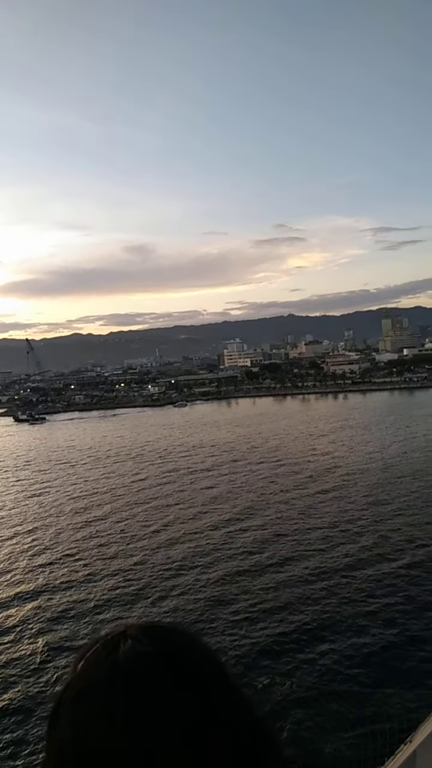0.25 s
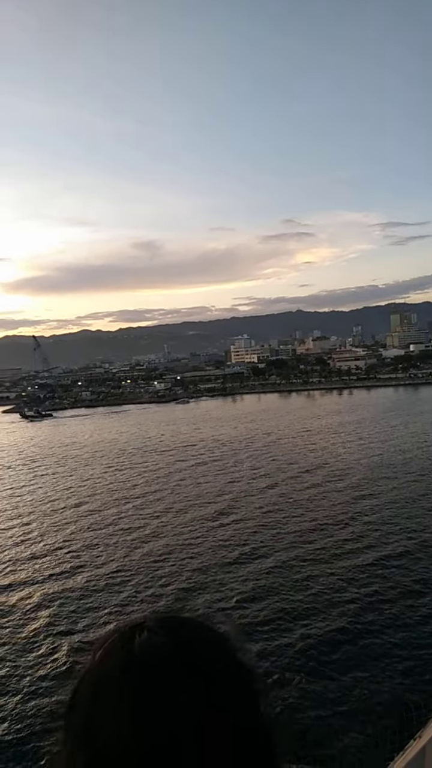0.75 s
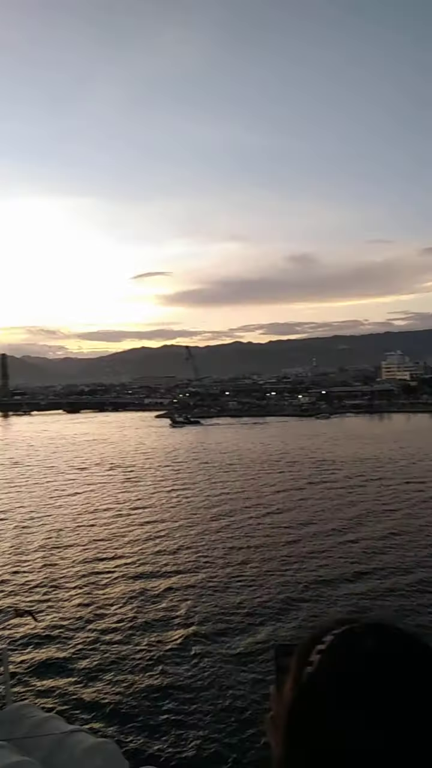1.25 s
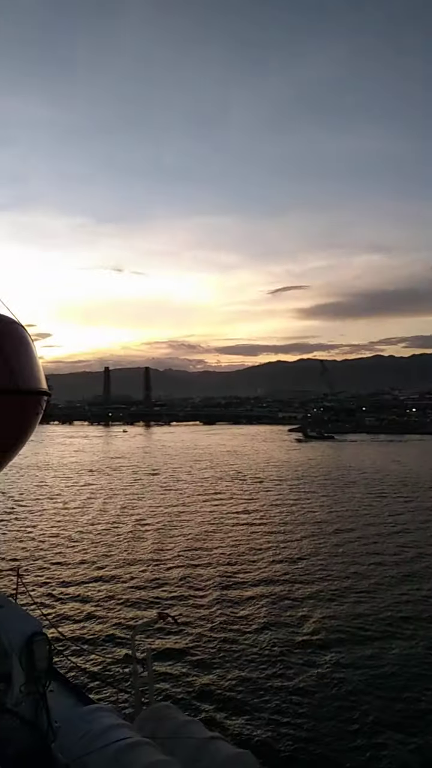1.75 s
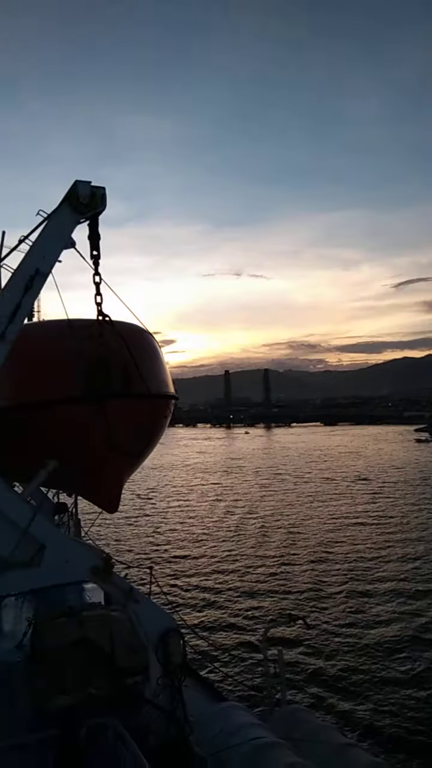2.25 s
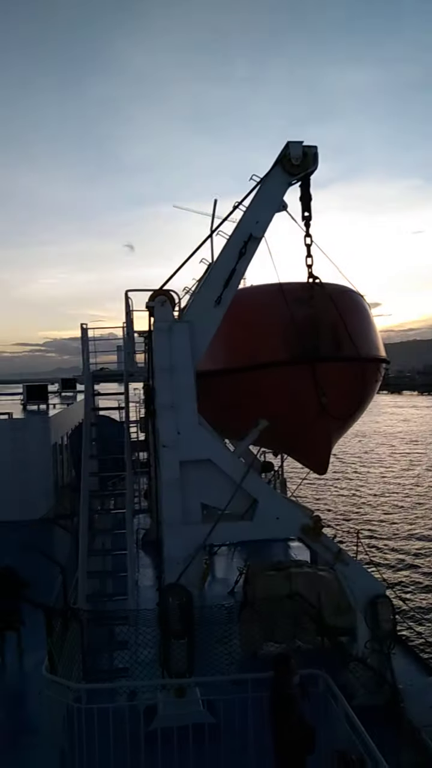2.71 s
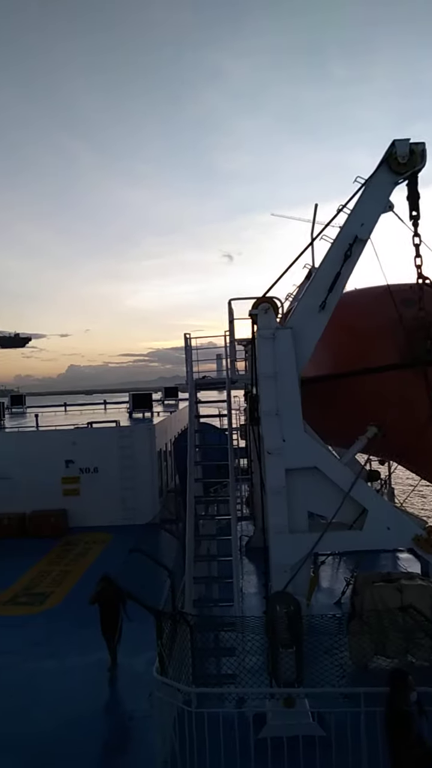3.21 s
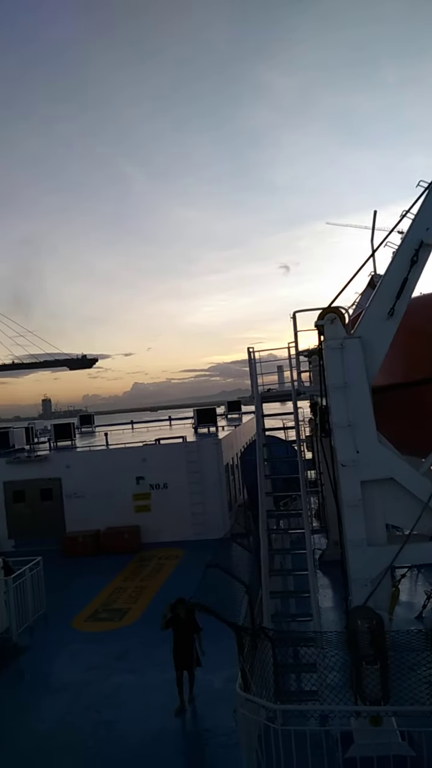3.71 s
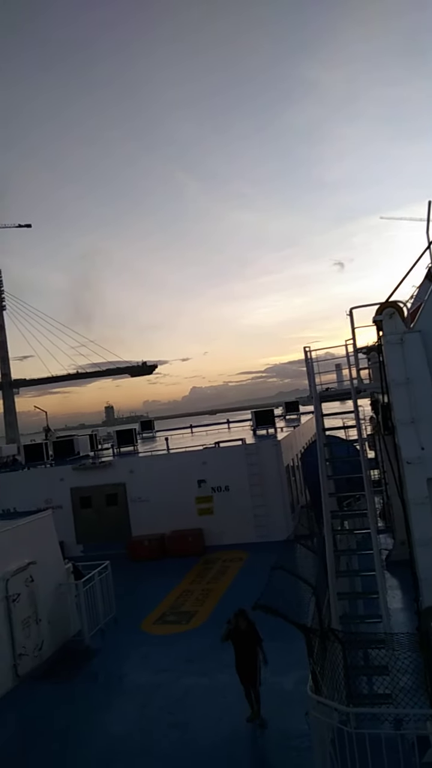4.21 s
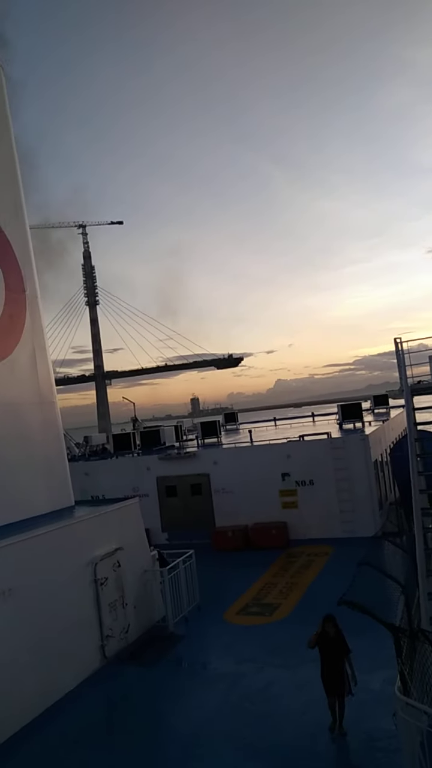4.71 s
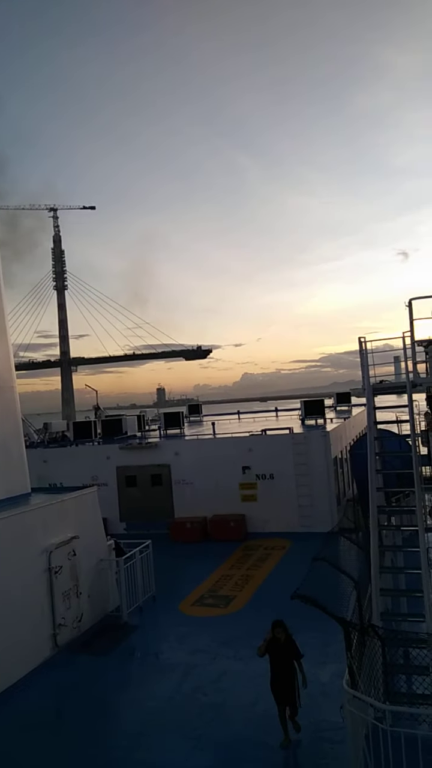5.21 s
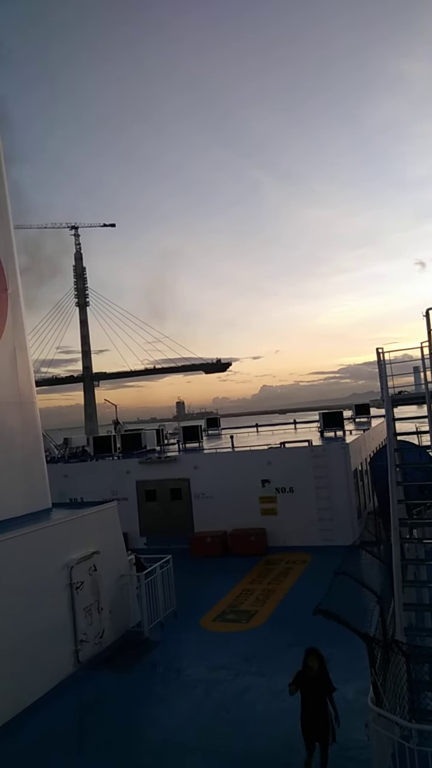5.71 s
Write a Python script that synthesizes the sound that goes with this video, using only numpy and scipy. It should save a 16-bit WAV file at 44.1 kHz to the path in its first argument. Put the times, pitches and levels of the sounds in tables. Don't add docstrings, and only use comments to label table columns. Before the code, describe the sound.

Low diesel hum and gulping, whistling air vents on an open ship deck; spray hisses by, then airy puffs and faint metallic knocks.

```python
import sys
import numpy as np
from scipy import signal
from scipy.fft import rfft, irfft, next_fast_len
from scipy.io import wavfile
from scipy.ndimage import uniform_filter1d

SR = 44100
rng = np.random.default_rng(int(sys.argv[2]) if len(sys.argv) > 2 else 0)


def volts(x):
    e = np.asarray(x, float) / 20
    return 10 ** e


def put_to_file(sound):
    columns = np.atleast_2d(sound).T
    safe = np.clip(columns, -1, 1)
    whole_steps = np.round(safe * 32767)
    wavfile.write(sys.argv[1], SR, whole_steps.astype(np.int16))


N = 262386
T = np.arange(N) / SR
LONG = next_fast_len(N)
HZ = np.arange(LONG // 2 + 1) * SR / LONG


def level(x, db):
    return x * volts(db) / np.sqrt(np.mean(x ** 2))


def across(table, hz):
    f, db = np.transpose(table)
    return np.interp(np.log(hz + 1), np.log(f), db)


def closed(table):
    ends = np.log([table[0][0], table[-1][0]])

    def colour(hz):
        outside = np.abs(np.log(hz + 1) - np.clip(np.log(hz + 1), *ends))
        return across(table, hz) - 300 * outside
    return colour


def noise(db_of_hz):
    white = rfft(rng.standard_normal(LONG))
    return level(irfft(white * volts(db_of_hz(HZ)), LONG)[:N], 0)


def curves(table):
    s, *columns = np.transpose(table)
    return [np.interp(T, s, c) for c in columns]


def walk(rate):
    k = int(SR / rate)
    held = np.repeat(rng.standard_normal(N // k + 1), k)
    return 0.64 * uniform_filter1d(uniform_filter1d(held, k), k)[:N]


def burst(s, length, edge_s=0.028):
    return np.interp(T, [s - edge_s / 2, s + edge_s / 2, s + length, s + length + 2 * edge_s], [0, 1, 1, 0])


# (t/s, share 0-1)
TURN = [
    (0, 0.17),
    (1.3, 0.02),
    (2.2, 0.83),
    (2.95, 0.4),
    (3.06, 0.81),
    (4.1, 0.95),
    (5.95, 0.82),
]


def turned(rail_db, funnel_db):
    waking = np.clip(1 - T / 0.39, 0, 1)
    return rail_db + (funnel_db - rail_db) * curves(TURN)[0] - 9.5 * waking


def resonant(bands, flutter_db, lift_db=0):
    out = 0
    for centre, width, rail_db, funnel_db in bands:
        band = noise(lambda hz: -30 * np.log10(1 + ((hz - centre) / (width / 2)) ** 2))
        out = out + volts(turned(rail_db, funnel_db) + lift_db + flutter_db * walk(15)) * band
    return out


def wavering_tones(table, steady=1.15):
    out = np.zeros(N)
    waver = uniform_filter1d(rng.standard_normal((2, N)), int(0.009 * SR), axis=1)
    waver = steady + (waver[0] + 1j * waver[1]) / waver.std()
    for s, length, hz, db in table:
        span = slice(int(s * SR), min(int((s + length) * SR), N))
        own_waver = waver[int(7 * hz):][:len(T[span])]
        tone = (own_waver * np.exp(2j * np.pi * hz * T[span])).real
        out[span] += level(tone * signal.windows.tukey(len(tone), .5), db + 0.5)
    return out


def short_rings(table):
    out, t = np.zeros(N + SR), T[:SR // 5]
    attack_s, t60_s = 0.0012, 0.085
    shape = np.clip(t / attack_s, 0, 1) * volts(-60 * t / t60_s)
    for s, db, hz in table:
        neighbour_hz = hz + 70 * rng.standard_normal()
        beat = np.sin(2 * np.pi * hz * t) + 0.24 * np.sin(2 * np.pi * neighbour_hz * t)
        out[int(s * SR):][:len(t)] += volts(db + 1) / 3.24 * shape * beat
    return out[:N]


# (f/Hz, level/dB per Hz)
RUMBLE = [(15, -32), (25, -13), (54, -3), (81, -4), (130, -8), (240, -14), (301, -13), (525, -17),
          (600, -71), (780, -73), (1320, -120)]
# (f/Hz, level/dB per Hz)
ROAR = [(300, 1.5), (400, 6), (530, -0.5), (900, -2.5), (1100, -11), (1520, -10.5), (1750, -13.5),
        (2120, -10.5), (2480, -21), (2800, -28.5), (3600, -56)]
# (f/Hz, level/dB per Hz)
HISS = [(1650, -79), (2800, 2), (3390, 0), (3850, 5), (4380, -3), (4730, -1.5), (5530, -4), (8000, -3.5),
        (10500, -18.5), (10800, -16.5), (12800, -3), (15200, -16.5)]
# (f/Hz, depth/dB)
DEPTH = [(300, -0.5), (450, 10), (2500, 20.5), (5000, 17.5), (8500, 18), (10800, 16.5), (12500, 2.5),
         (15500, 10)]


def roar():
    out = volts(-47.5 + 0.54 * walk(3.6)) * noise(closed(RUMBLE))
    for colour, left_db in ((ROAR, -58), (HISS, -72.5)):
        left = closed(colour)(HZ)
        whole = left + across(DEPTH, HZ)
        lift = np.sqrt(np.sum(volts(2 * whole)) / np.sum(volts(2 * left)))
        out += volts(left_db) * lift * noise(lambda hz: whole)
    return out


# (f/Hz, width/Hz, level/dB at the rail, level/dB at the funnel)
DUCTS = [(903, 230, -54, -63), (1374, 205, -63.5, -62), (1538, 238, -52, -60), (2125, 178, -58.5, -57.5),
         (2120, 654, -85, -48.5), (3220, 1380, -56.5, -76.5)]
# (t/s, length/s, lift/dB)
LOW_GULPS = [
    (0.574, 0.072, -2),
    (0.8, 0.12, 5),
    (1.147, 0.24, 3),
    (1.74, 0.15, 9.5),
    (2.044, 0.39, 8),
    (3.625, 0.39, 12),
    (4.32, 0.37, 6),
    (3.06, 0.07, 10),
]
# (t/s, length/s, lift/dB)
SECOND_GULPS = [
    (2.278, 0.62, 9.5),
    (3.052, 0.21, 4),
    (3.616, 0.39, 7),
    (5.27, 0.18, 5.5),
    (5.813, 0.069, 6.5),
]


def vents():
    draught = 1.03 * walk(40)
    low = sum(db * burst(s, length) for s, length, db in LOW_GULPS)
    second = sum(db * burst(s, length) for s, length, db in SECOND_GULPS)
    out = resonant(DUCTS[:1], flutter_db=-2.5, lift_db=low + draught)
    out = out + resonant(DUCTS[1:2], flutter_db=-1.5, lift_db=second + draught)
    return out + resonant(DUCTS[2:], flutter_db=1.1, lift_db=draught)


# (f/Hz, width/Hz, level/dB at the rail, level/dB at the funnel)
SLAP = [(1142, 540, -51.5, -82), (1800, 320, -57, -68.5)]


def slap():
    return resonant(SLAP, flutter_db=3.0)


# (t/s, level/dB)
SHEET = [(1.32, -65), (1.35, -56.5), (1.39, -63), (1.42, -62), (1.45, -56), (1.55, -53.5), (1.59, -52),
         (1.62, -47), (1.7, -46.5), (1.76, -44), (2.07, -42.5), (2.12, -46), (2.25, -46), (2.29, -43),
         (2.7, -44), (3.27, -45.5), (3.42, -45.5), (3.51, -53.5), (3.56, -62), (3.62, -75)]
# (t/s, length/s, level/dB)
GUSTS = [
    (0.0, 0.049, -69),
    (1.378, 0.042, -57.5),
    (3.78, 0.14, -57),
    (5.825, 0.093, -75),
]
# (level/dB at the rail, level/dB at the funnel, level/dB on the sheet, level/dB on a gust)
WASH = [
    (-65.5, -74, 0.5, -9.5),
    (-76, -99, -17, -11),
    (-75, -77, -45, -16),
]
# (t/s, level/dB)
DRIFT = [(0.0, -77), (0.01, -61.5), (0.15, -93), (0.3, -71.5), (1.59, -64), (1.69, -57), (2.07, -56),
         (2.22, -62.5), (2.58, -56), (3.08, -60), (3.12, -56.5), (3.51, -64), (3.6, -68), (3.68, -62),
         (3.78, -63.5), (3.83, -59), (4.62, -72.5), (5.95, -70)]
# (f/Hz, level/dB per Hz)
SPRAY = [(1760, -68), (3000, -18.5), (3210, -15.5), (3610, -5.5), (3960, 1), (4300, -1), (4600, 2.5),
         (5800, 0), (6400, -16), (8840, -28), (15000, -120)]
MIST = [(5240, -51), (8900, -7), (9180, 11.5), (9540, 13.5), (10100, 16.5), (10800, 11.5), (11400, -24),
        (14800, -65), (22000, -120)]
WIND = [(5760, 2), (9800, -41), (10300, -11), (11100, 4), (12700, -2), (13500, -7), (15200, -7)]
DRIFT_COLOUR = [(3470, -55), (5900, -5), (6240, -2.5), (6490, 1), (6700, 1.5), (7010, -4.5), (7230, 2),
                (7520, 0.5), (7620, -1), (8120, -1), (8410, -14), (8550, -2.5), (8900, -33), (11600, -61),
                (19600, -120)]


def wash():
    sheet = volts(curves(SHEET)[0]) * (T > SHEET[0][0]) * (T < SHEET[-1][0])
    gusts = sum(volts(db) * burst(s, length, edge_s=0.11) ** 2 for s, length, db in GUSTS)
    gains = []
    for rail_db, funnel_db, sheet_db, gust_db in WASH:
        gains.append(volts(turned(rail_db, funnel_db)) + volts(sheet_db) * sheet + volts(gust_db) * gusts)
    gains.append(volts(curves(DRIFT)[0] + 2))
    shared_db = 1.0 * walk(44.94)
    out = 0
    for gain, colour in zip(gains, (SPRAY, MIST, WIND, DRIFT_COLOUR)):
        own_db = 1.35 * walk(35.26)
        out = out + gain * volts(shared_db + own_db) * noise(closed(colour))
    return out


# (t/s, length/s, f/Hz, level/dB)
LOW_SWELLS = [(0.124, 0.025, 995, -50.5), (0.63, 0.055, 1008, -51), (0.804, 0.018, 954, -41.5),
              (0.904, 0.059, 977, -50), (1.143, 0.1, 903, -49), (1.482, 0.043, 1164, -52),
              (1.672, 0.041, 645, -48.5), (1.755, 0.054, 838, -48), (1.858, 0.044, 1140, -52.5),
              (2.063, 0.042, 933, -49), (2.167, 0.058, 627, -51), (2.332, 0.063, 710, -51),
              (2.482, 0.027, 879, -45), (2.573, 0.022, 707, -45.5), (3.651, 0.027, 938, -49.5),
              (3.832, 0.043, 923, -51), (3.956, 0.048, 372, -45.5), (4.016, 0.023, 863, -44),
              (5.478, 0.019, 856, -48), (5.497, 0.076, 648, -49.5), (5.543, 0.16, 698, -50),
              (5.853, 0.03, 686, -50)]
# (t/s, length/s, f/Hz, level/dB)
HIGH_SWELLS = [(0.499, 0.048, 1309, -51.5), (0.758, 0.14, 2964, -58.5), (0.765, 0.078, 1588, -53),
               (1.322, 0.047, 1836, -49.5), (1.327, 0.039, 2093, -52), (1.43, 0.11, 1538, -54.5),
               (1.473, 0.032, 1840, -54), (2.01, 0.041, 1502, -50.5), (2.211, 0.16, 1536, -51.5),
               (2.465, 0.087, 2130, -50.5), (3.077, 0.037, 1390, -54), (3.089, 0.074, 2070, -48),
               (3.264, 0.11, 1473, -52), (3.614, 0.16, 1433, -54.5), (3.823, 0.029, 2230, -51),
               (4.024, 0.13, 1334, -53.5), (4.393, 0.079, 2500, -58.5), (4.712, 0.056, 1992, -51.5),
               (5.363, 0.039, 1510, -50.5), (5.43, 0.019, 4040, -60), (5.637, 0.052, 4230, -66),
               (5.602, 0.056, 1538, -54), (5.814, 0.074, 1480, -55.5), (4.401, 0.047, 1522, -51.5),
               (4.655, 0.062, 1534, -52.5), (5.21, 0.064, 855, -55)]
# (t/s, length/s, f/Hz, level/dB)
LEAKS = [(0.191, 0.2, 1757, -57), (0.252, 0.17, 3025, -63.5), (0.561, 0.083, 3350, -66),
         (0.6, 0.12, 2130, -60), (0.885, 0.12, 1180, -55), (0.92, 0.11, 3056, -62),
         (1.152, 0.04, 3850, -63), (1.239, 0.055, 3450, -64), (1.877, 0.15, 1480, -57.5),
         (1.884, 0.13, 1757, -59.5), (2.138, 0.13, 1793, -55.5), (2.172, 0.057, 2200, -59),
         (2.17, 0.078, 2800, -68), (2.29, 0.055, 2480, -58), (2.401, 0.14, 1504, -55.5),
         (2.435, 0.06, 877, -52.5), (2.751, 0.03, 671, -51.5), (2.803, 0.048, 922, -53.5),
         (2.98, 0.037, 952, -53), (1.998, 0.12, 3460, -58.5), (2.05, 0.09, 3160, -62),
         (3.01, 0.037, 2560, -60), (3.07, 0.11, 860, -53.5), (3.189, 0.085, 787, -53),
         (3.202, 0.048, 1517, -53), (3.255, 0.025, 2580, -60), (3.412, 0.037, 959, -54.5),
         (3.48, 0.046, 1556, -55), (4.062, 0.04, 899, -54.5), (4.23, 0.025, 713, -52),
         (4.321, 0.06, 847, -51), (4.407, 0.038, 860, -54), (1.06, 0.057, 1186, -55),
         (1.079, 0.2, 1850, -57.5), (0.761, 0.06, 3900, -63.5), (0.87, 0.07, 4000, -63),
         (0.97, 0.038, 4150, -63.5), (4.455, 0.029, 838.6, -49), (4.48, 0.06, 1350, -59),
         (4.58, 0.064, 1340, -57), (4.6, 0.035, 830, -52), (4.665, 0.037, 814, -51.5),
         (4.834, 0.027, 879, -50), (4.943, 0.03, 1377, -58), (4.98, 0.04, 1500, -60),
         (5.061, 0.079, 1554, -59.5), (5.277, 0.07, 1480, -57.5), (5.361, 0.03, 870, -49.5),
         (2.931, 0.1, 2148, -57.5), (5.11, 0.084, 2080, -54), (5.883, 0.056, 960, -56)]


def duct_swells():
    lowest = (0.05, 0.03, 2900, -68)  # t/s, length/s, f/Hz, level/dB
    highest = (1.22, 0.07, 3900, -60)
    chirps = rng.uniform(lowest, highest, (12, 4))
    return wavering_tones([*LOW_SWELLS, *HIGH_SWELLS, *LEAKS, *chirps])


# (t/s, length/s, f/Hz, level/dB)
THIN_STREAKS = [(0.003, 0.11, 7900, -69.5), (0.224, 0.13, 6230, -78), (0.266, 0.08, 8000, -71),
                (0.418, 0.37, 8200, -73), (0.761, 0.29, 7700, -70.5), (1.162, 0.12, 5210, -67.5),
                (1.281, 0.12, 6450, -70.5), (1.337, 0.067, 4450, -58.5), (1.33, 0.063, 5000, -65),
                (1.426, 0.16, 4400, -55.5), (1.436, 0.15, 5300, -59), (1.46, 0.066, 3100, -65),
                (2.846, 0.38, 4018, -55), (3.018, 0.35, 4773, -50.5), (2.518, 0.2, 5100, -59),
                (2.218, 0.24, 3715, -64), (2.513, 0.65, 3750, -56.5), (3.603, 0.08, 7400, -73),
                (3.626, 0.096, 3650, -65.5), (3.64, 0.04, 2800, -63), (3.815, 0.034, 3850, -60.5),
                (3.845, 0.035, 3200, -58.5), (3.886, 0.054, 3100, -65), (3.788, 0.17, 4850, -70.5),
                (3.935, 0.17, 3950, -66), (4.01, 0.23, 8100, -72), (3.962, 0.1, 6350, -74),
                (4.192, 0.079, 6400, -70.5), (4.255, 0.04, 3950, -63.5), (4.312, 0.047, 3800, -62.5),
                (4.32, 0.06, 6600, -71), (4.32, 0.06, 4850, -71), (4.416, 0.07, 4050, -66),
                (4.412, 0.064, 7900, -69), (4.62, 0.12, 7900, -73), (4.618, 0.08, 6300, -72.5),
                (4.895, 0.24, 6250, -73.5), (5.011, 0.058, 4050, -64.5), (5.16, 0.13, 8150, -75),
                (5.31, 0.09, 7850, -73), (5.51, 0.043, 3120, -64), (5.62, 0.1, 7900, -72.5),
                (0.003, 0.082, 5210, -68), (2.158, 0.08, 6800, -62), (5.45, 0.07, 7350, -75),
                (5.66, 0.05, 7350, -75), (5.42, 0.13, 6520, -75), (5.88, 0.05, 7850, -74),
                (5.807, 0.045, 3300, -64), (5.834, 0.055, 4000, -63.5), (4.953, 0.1, 1960, -58),
                (5.563, 0.071, 1980, -54)]


def thin_streaks():
    return wavering_tones(THIN_STREAKS)


# (t/s, length/s, level/dB)
WHISTLE = [(0.008, 0.097, -49), (0.196, 0.095, -47.5), (0.384, 0.071, -46.5), (0.496, 0.15, -48),
           (0.695, 0.091, -51.5), (0.809, 0.15, -49), (1.003, 0.1, -45.5), (1.345, 0.036, -45),
           (1.861, 0.075, -52), (2.233, 0.033, -47), (3.222, 0.048, -49), (3.89, 0.038, -49)]


def fan_whistle():
    fan_hz = 472
    return wavering_tones([(s, length, fan_hz, db) for s, length, db in WHISTLE], steady=1.15 + 1.2)


# (t/s, peak level/dB, f/Hz)
PUFFS = [(0.119, -32.5, 1140), (0.839, -28.5, 927), (1.181, -30.5, 856), (1.443, -40, 1496),
         (2.023, -32, 1506), (2.088, -28.5, 933), (3.016, -35, 2120), (3.608, -27, 2190),
         (3.741, -47, 2060), (4.11, -33, 1350), (4.63, -31, 2045), (4.886, -50, 2220), (5.291, -30.5, 2010),
         (5.576, -36, 722), (5.72, -44, 2080), (5.81, -34.5, 2120)]


def puffs():
    return short_rings(PUFFS)


# (t/s, peak level/dB, f/Hz)
SQUEAKS = [
    (0.483, -46, 8370),
    (0.9343, -50, 7420),
    (3.6691, -45, 6500),
    (3.8247, -45, 7910),
    (4.0721, -44, 7940),
    (4.1405, -51, 8100),
]
# (t/s, peak level/dB, f/Hz)
TICK = [
    (3.850, -48, 12750),
]


def squeaks():
    return short_rings([*SQUEAKS, *TICK])


# (t/s, peak level/dB)
KNOCKS = [
    (2.1878, -42),
    (3.8482, -53),
    (5.1888, -39.5),
    (5.8107, -48.5),
]
# (f/Hz, level/dB, time to fall 60 dB/s)
FITTING = [(2600, -4, .05), (2850, -1, .06), (3070, 1, .13), (4480, -1, .13), (4900, -6, .04),
           (5280, -4, .06)]


def knocks():
    out, t = np.zeros(N), T[:SR // 5]
    crack_band = signal.butter(2, (2500, 5600), "band", fs=SR, output="sos")
    for s, db in KNOCKS:
        ring = np.zeros(len(t))
        for hz, pitch_db, t60 in FITTING:
            hit_db = pitch_db + 1.0 * rng.standard_normal()
            ring += volts(hit_db - 60 * t / t60) * np.sin(2 * np.pi * hz * t)
        crack = signal.sosfilt(crack_band, rng.standard_normal(len(t)))
        ring += volts(6.5 - 60 * t / 0.033) * crack
        start = int(s * SR)
        out[start:][:len(t)] += (volts(db - 8) * ring)[:N - start]
    return out


def diesel(track, orders, tracked_order, waver_db):
    hz, db = curves(track)
    cycle = 2 * np.pi * np.cumsum(hz / tracked_order) / SR
    out = 0
    for k, gain_db in orders:
        tone = np.sin(k * cycle + 2 * np.pi * rng.random())
        out = out + volts(gain_db + waver_db * walk(1.4)) * tone
    return np.sqrt(2) * out * volts(db - db.mean())


# (t/s, f/Hz, level/dB)
GENERATOR = [
    (0, 120.03, -54),
    (1, 120.0, -52),
    (1.8, 119.7, -51),
    (3, 119.65, -50),
    (5.95, 119.7, -50),
]
# (multiple of the four-stroke cycle, level/dB)
GENERATOR_ORDERS = [(8, -56.0), (12, -51.0), (13, -63.0), (15, -54.0), (16, -61.0), (17, -58.0),
                    (20, -51.0), (21, -59.0), (23, -62.0), (24, -62.0), (26, -61.0), (27, -61.0),
                    (30, -64.0), (31, -65.0), (32, -63.0), (33, -66.0), (35, -61.0), (45, -68.0),
                    (47, -68.0), (48, -68.0), (49, -66.0), (50, -69.0), (51, -69.0), (52, -67.0),
                    (55, -68.0), (58, -69.0), (59, -70.0), (61, -68.0), (62, -68.0), (69, -70.0)]


def generator():
    return diesel(GENERATOR, GENERATOR_ORDERS, tracked_order=20, waver_db=2.5)


# (t/s, f/Hz, level/dB)
MAIN = [
    (0, 51.8, -52),
    (1, 51.8, -50),
    (3.3, 51.8, -52.5),
    (3.8, 51.8, -55.5),
    (4.7, 51.8, -58),
    (5.95, 51.8, -51.5),
]
# (multiple of the four-stroke cycle, level/dB)
MAIN_ORDERS = [(8, -72), (11, -73), (13, -59), (15, -50), (16, -57), (17, -58), (18, -62), (19, -65),
               (22, -62), (25, -64), (27, -61)]


def main_engine():
    return diesel(MAIN, MAIN_ORDERS, tracked_order=15, waver_db=1.5)


def scene():
    air = roar() + vents() + duct_swells() + thin_streaks() + fan_whistle() + puffs()
    water = slap() + wash()
    metal = squeaks() + knocks()
    return (air + water + metal + generator() + main_engine())[None]


# (f/Hz, level/dB)
FOLLOW = [(300, -20), (500, -5), (1700, -6), (2150, -11), (2700, -3), (4000, -3.2), (6000, -3), (7500, -.5),
          (9300, -6), (15500, -12)]
# (f/Hz, lift/dB)
LEAK = [(1750, -.3), (2150, 2.2), (2500, 0), (4100, .6), (4600, -.8), (5900, -.8), (6300, 1.2), (6800, -1),
        (7900, 1.1), (8600, -1.6), (10500, -1.6), (11100, 0), (12000, -1.5)]


def suppress(x, recent_s=0.3):
    frames = dict(fs=SR, nperseg=940, noverlap=705)
    hz, s, z = signal.stft(x, **frames)
    band_hz = hz[::2]

    def smooth(v, seconds):
        return uniform_filter1d(v, max(int(seconds / s[1]), 1), axis=1)

    def bands(v):
        return uniform_filter1d(np.abs(v) ** 2, size=3, axis=0)[::2]

    power = bands(z)
    learnt_roar = signal.stft(roar(), **frames)[2]
    steady = np.mean(bands(learnt_roar), axis=1, keepdims=True)
    recent = uniform_filter1d(smooth(power, recent_s), size=5, axis=0)
    estimate = volts(2 * 4.0) * steady + volts(2 * across(FOLLOW, band_hz))[:, None] * recent
    chance = rng.standard_normal((3, *power.shape))
    error = 3.4 * smooth(chance[0], .6)
    error += .8 * smooth(smooth(chance[1], .14), .02)
    error += .55 * smooth(chance[2], .025)
    error += .2 * smooth(rng.standard_normal((1, len(s))), .025)
    margin_db = 10 * np.log10(smooth(power, .045) / estimate) + 1.4 * error / error.std()
    margin_db += across(LEAK, band_hz)[:, None]
    opening = np.repeat(.5 + .5 * np.tanh(margin_db / 1.7), 2, axis=0)[1:]
    opening[1::2] = (opening[:-1:2] + opening[2::2]) / 2
    floor = volts(-across(DEPTH, hz))[:, None]
    return signal.istft(z * (floor + (1 - floor) * opening), **frames)[1][:N]


def roll_off(x):
    return signal.sosfilt(signal.butter(12, 15400, fs=SR, output="sos"), x)


def record(dry):
    bass_cut = signal.butter(3, 38, "high", fs=SR, output="sos")
    mix = suppress(signal.sosfilt(bass_cut, dry[0]))[None]
    return roll_off(mix)


dry = scene()
out = record(dry)
put_to_file(out)
```